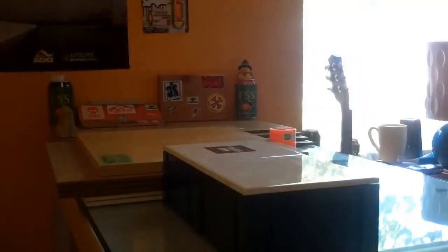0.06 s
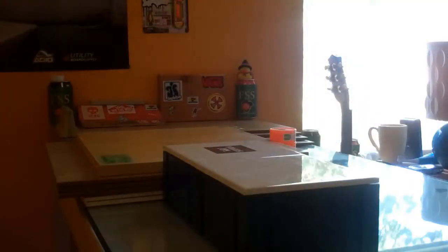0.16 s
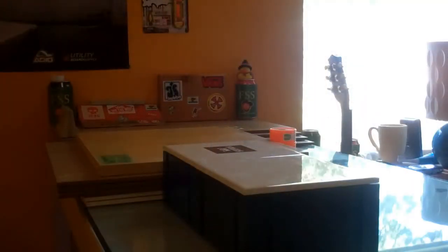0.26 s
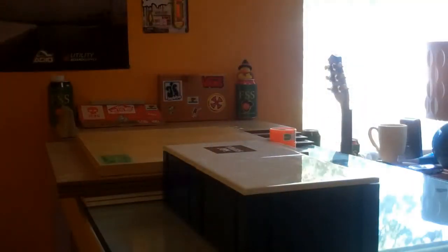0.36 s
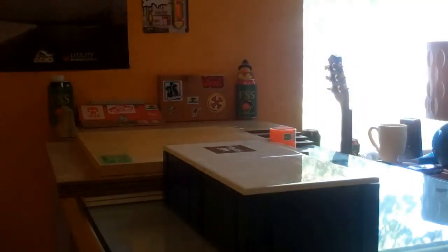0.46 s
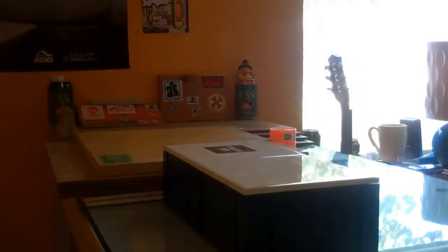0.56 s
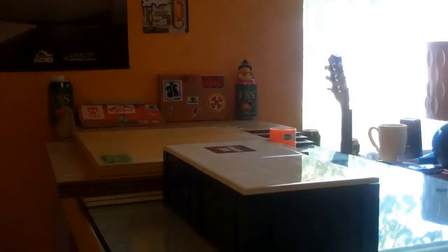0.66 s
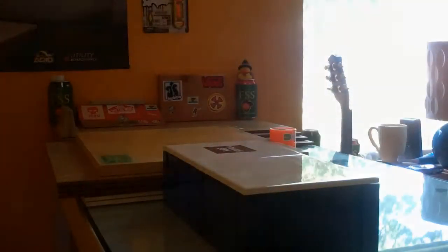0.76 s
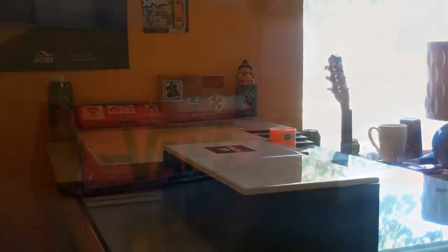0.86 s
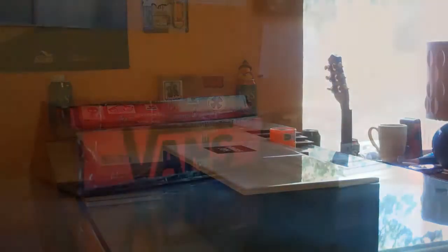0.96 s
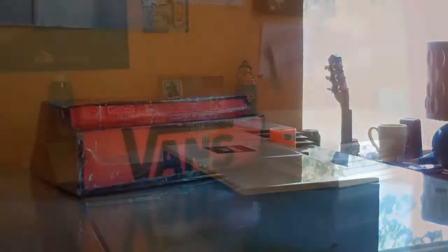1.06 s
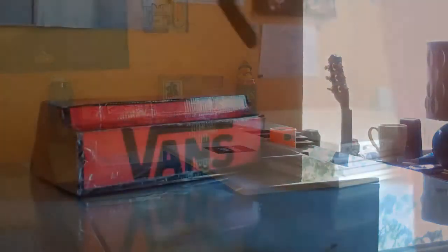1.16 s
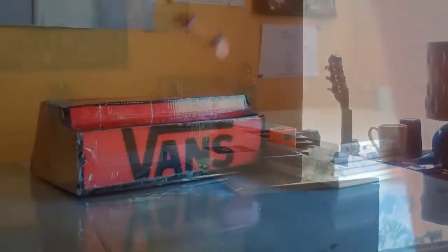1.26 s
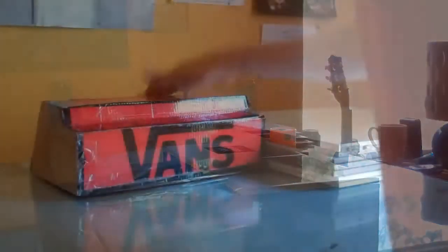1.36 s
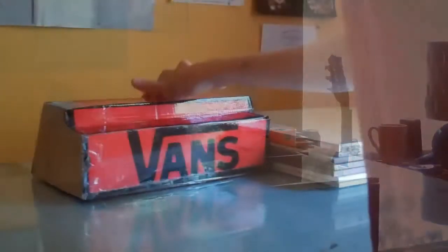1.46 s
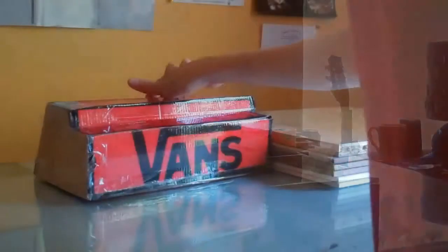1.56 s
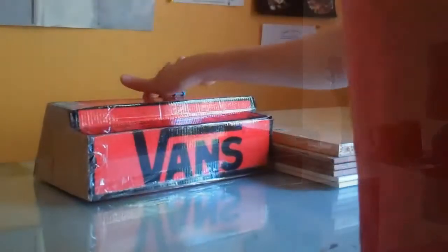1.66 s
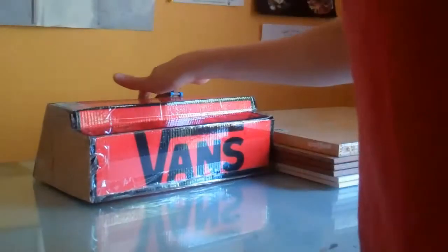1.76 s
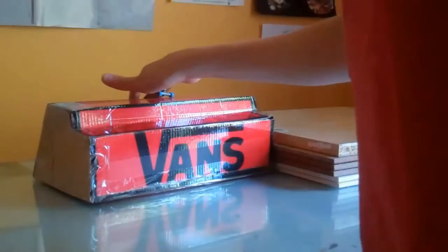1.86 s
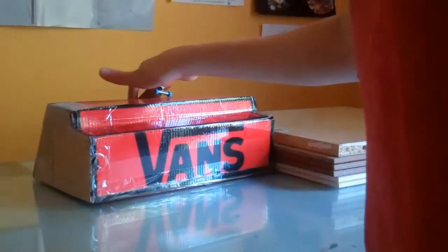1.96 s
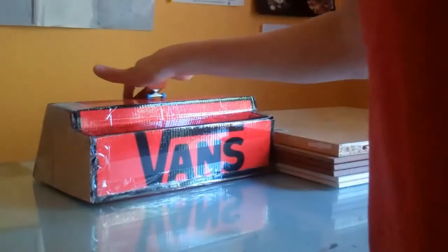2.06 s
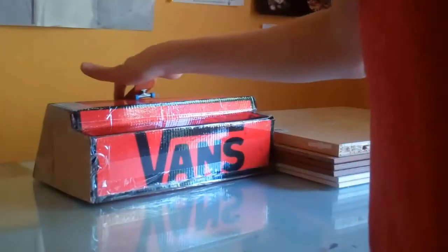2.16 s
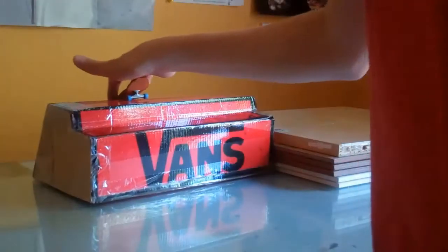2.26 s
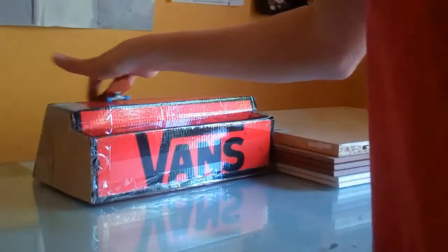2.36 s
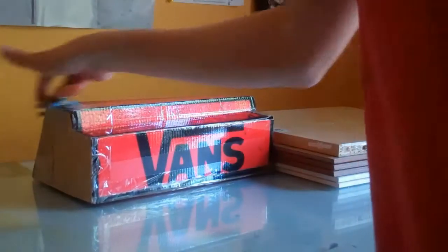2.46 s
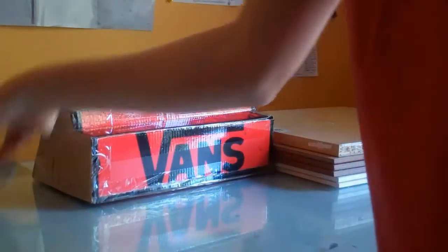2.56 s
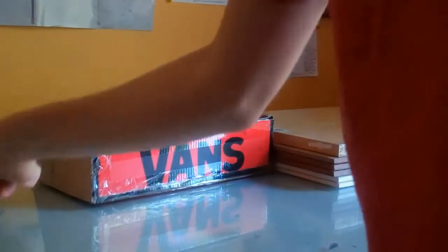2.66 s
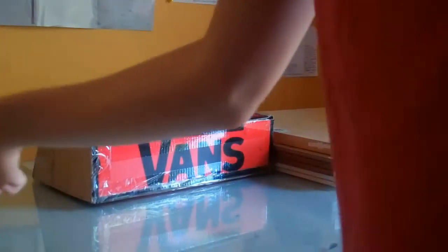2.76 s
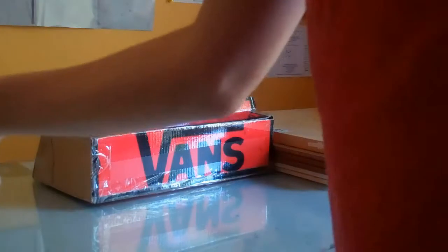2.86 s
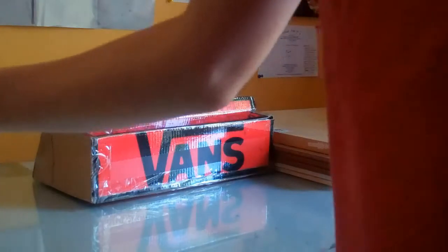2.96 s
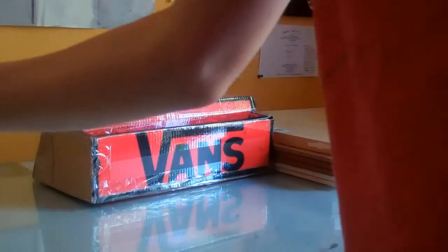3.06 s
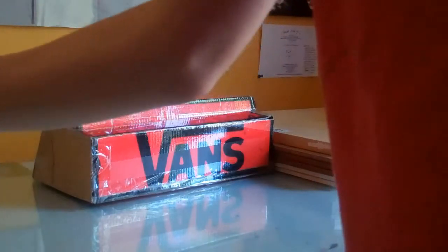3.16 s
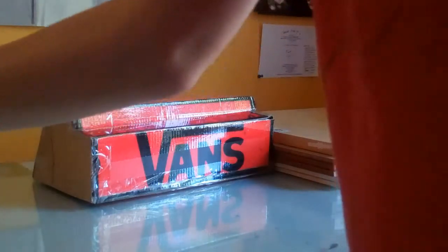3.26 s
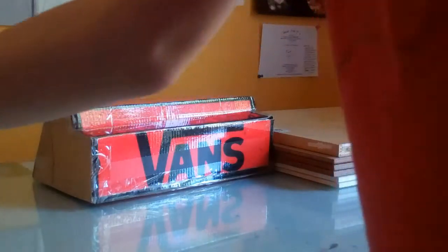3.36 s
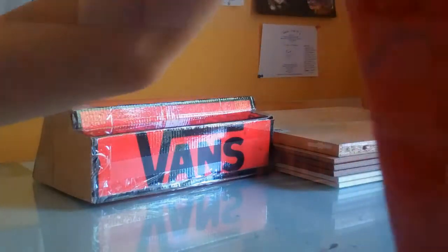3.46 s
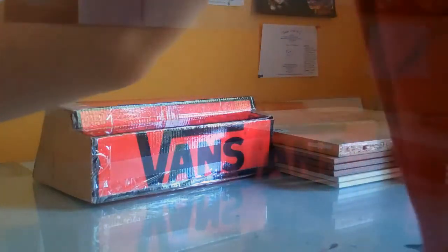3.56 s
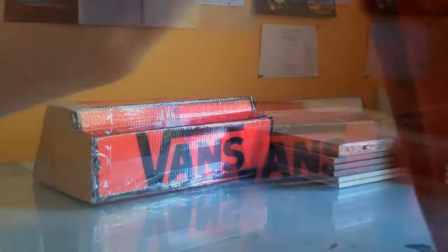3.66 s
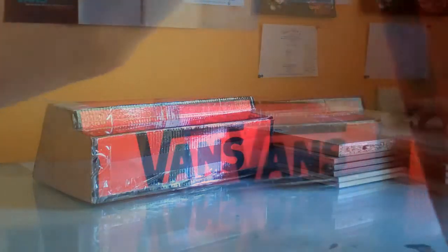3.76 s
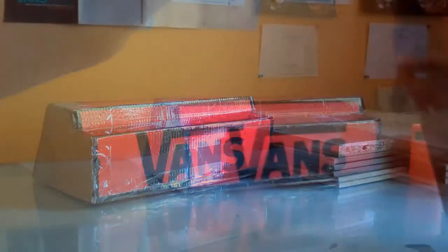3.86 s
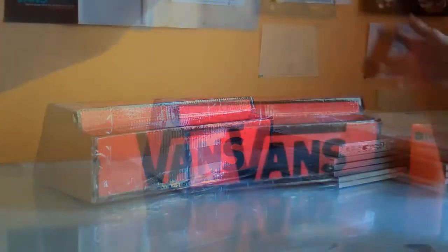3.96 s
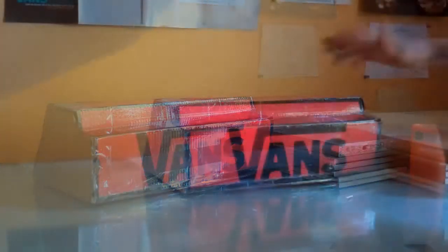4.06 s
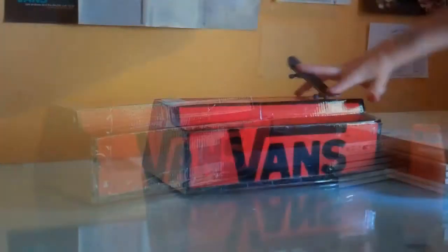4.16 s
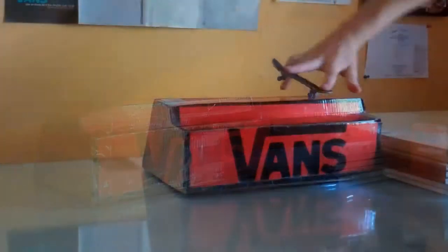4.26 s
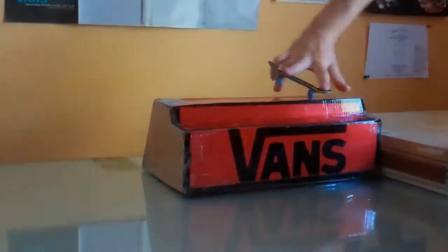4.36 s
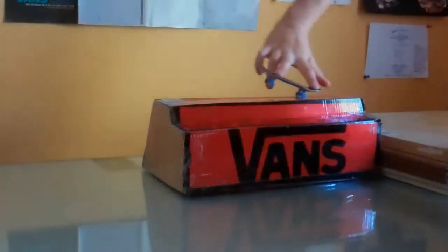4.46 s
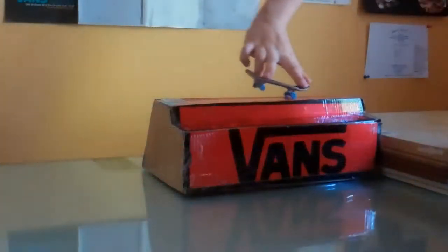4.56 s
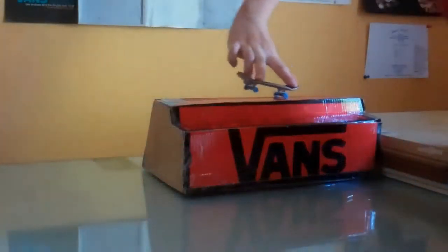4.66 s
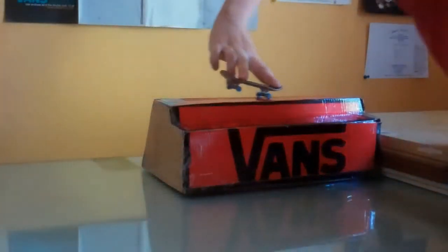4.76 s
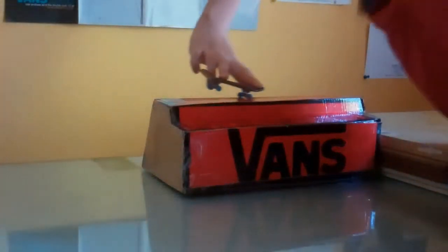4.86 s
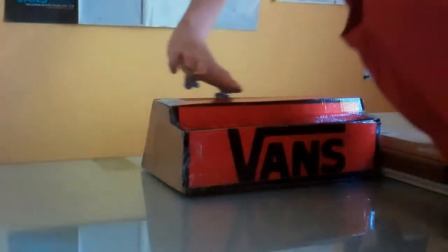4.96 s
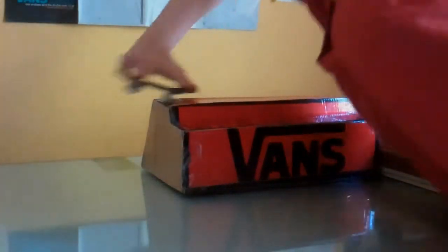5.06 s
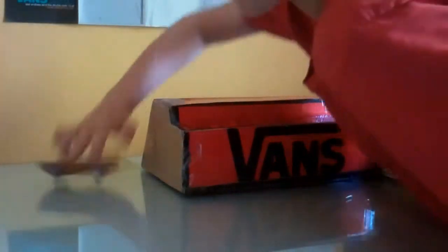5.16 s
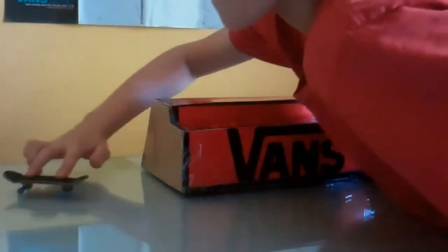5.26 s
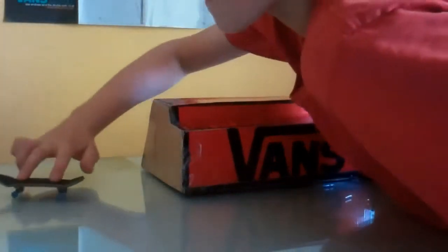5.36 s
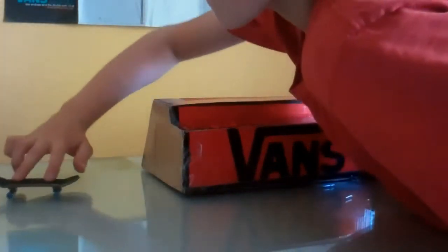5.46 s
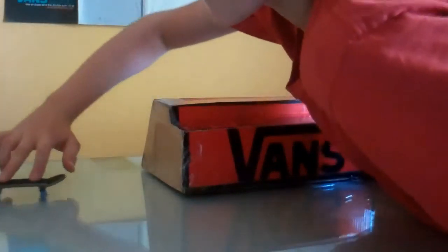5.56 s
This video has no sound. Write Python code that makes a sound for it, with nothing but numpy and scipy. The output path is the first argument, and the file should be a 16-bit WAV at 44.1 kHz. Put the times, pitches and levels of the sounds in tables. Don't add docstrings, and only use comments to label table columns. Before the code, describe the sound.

A tiny finger-driven skateboard rolls and drags on a glossy table, clacks onto a hollow box, grinds its edge and drops off clattering, twice.

```python
import sys
import numpy as np
from scipy import signal
from scipy.fft import rfft, irfft, next_fast_len
from scipy.io import wavfile

SR = 44100
rng = np.random.default_rng(int(sys.argv[2]) if len(sys.argv) > 2 else 0)


def gain_from_decibels(decibels):
    exponent = np.asarray(decibels, float) / 20
    return 10 ** exponent


def master_out(mix):
    frames = np.transpose(np.atleast_2d(mix))
    ceiling = np.clip(frames, -1, 1)
    pcm = np.round(ceiling * 32767).astype(np.int16)
    wavfile.write(sys.argv[1], SR, pcm)


N = 246959
SIZE = next_fast_len(N + SR // 2)
HZ = np.arange(SIZE // 2 + 1) * SR / SIZE
WANDER_DB = 2.0

# (frequency [Hz], width [Hz], level [dB])
HOLLOW = [(243, 103, -7), (397, 46, 1), (476, 65, -0.5), (606, 129, 0), (695, 93, -1)]
# (frequency [Hz], width [Hz], level [dB])
PANELS = [(773, 49, -7), (954, 63, -2), (1076, 92, -0.5), (1254, 170, -2), (1530, 300, -0.5),
          (1730, 440, -2.5), (2026, 390, -4.5), (2610, 160, -6.5), (3150, 490, -10)]


def rms_one(x):
    return x / np.sqrt(np.mean(x ** 2) + 1e-20)


def at_hz(points, hz):
    table_hz, values = np.array(points).T
    return np.interp(np.log(hz + 1), np.log(table_hz), values)


def filtered(x, response):
    return irfft(rfft(x, SIZE) * response, SIZE)[..., :N]


def drift(rate):
    r = np.exp(-80 * np.pi * rate / SR)
    chance = rng.standard_normal(N // 40 + 2002)
    slow = signal.lfilter([1], [1, -2 * r, r * r], chance)[2000:]
    return np.interp(np.arange(N) / 40, np.arange(len(slow)), rms_one(slow))


def swell(at_s, rise_s, fall_s):
    shape = 1.61
    t = np.arange(N) / SR - at_s
    span_s = np.where(t < 0, max(rise_s, .002), max(fall_s, .002))
    return np.exp(-np.abs(t / span_s) ** shape)


def strokes(rows):
    return sum(swell(*row[:3]) * gain_from_decibels(np.cumsum(row[3:]))[:, None] for row in rows)


def grit(per_s, spread_db, lumps_db, lump_rate):
    sizes = gain_from_decibels(spread_db * np.minimum(rng.exponential(1, N), 5)) * rng.choice([-1, 1], N)
    present = rng.random(N) < per_s / SR
    return sizes * present * gain_from_decibels(lumps_db * drift(lump_rate))


def resonate(x, hz, width_hz):
    r = np.exp(-np.pi * width_hz / SR)
    poles = [1, -2 * r * np.cos(2 * np.pi * hz / SR), r * r]
    return signal.lfilter(np.array([1, 0, -1]) * (1 - r * r) / 2, poles, x + 1e-18)


def body(x, peaks, luck_db, turn=-1):
    return sum(turn ** k * gain_from_decibels(db + luck_db[k]) * resonate(x, hz, width_hz)
               for k, (hz, width_hz, db) in enumerate(peaks))


def travelling(x, peaks, wander_db):
    return rms_one(body(x, peaks, [wander_db * drift(8.9) for _ in peaks]))


def rolling():
    # (fastest at [s], rise [s], fall [s], bearing rattle [dB], deck hum above rattle [dB])
    rolls = [(0.0, .02, 0.058, -64.5, -24), (.11, .025, 0.067, -55.5, -0.5), (.23, 0.046, 0.053, -60, -0.5),
             (3.02, 0.079, 0.059, -58.5, 3), (3.4, 0.25, 0.1, -49, 3), (3.49, 0.037, 0.031, -62.5, 8.5),
             (3.62, 0.075, 0.093, -63, 5), (3.82, 0.09, 0.062, -55.5, -3), (4.1, 0.071, 0.11, -62, -4.5),
             (4.22, 0.051, .14, -55.5, 1), (5.09, 0.039, 0.024, -49, 12.5), (5.18, 0.043, 0.038, -51.5, -3),
             (5.235, 0.013, 0.047, -54, -7.5), (5.59, 0.12, .05, -69.5, -10), (2.89, .05, 0.034, -60, -7.5)]
    # (frequency [Hz], width [Hz], level [dB])
    wheels = [(2110, 330, -9), (3140, 480, -6), (3522, 89, 3.5), (3689, 140, 2), (4590, 640, -10),
              (5620, 510, -6), (7560, 940, -9), (10300, 3100, -13.5)]
    # (frequency [Hz], width [Hz], level [dB])
    deck_hum = [(650, 340, -10.5), (972, 120, -3), (1105, 41, 7), (1275, 115, 0), (1435, 157, -3),
                (1716, 190, -3.5)]
    rattle_gain, hum_gain = strokes(rolls)
    bumps = grit(9000.0, 2.6, 1.6, 31.0)
    rattle = rattle_gain * gain_from_decibels(5.0) * travelling(bumps, wheels, WANDER_DB)
    return rattle + hum_gain * gain_from_decibels(-1.3) * travelling(bumps, deck_hum, WANDER_DB)


def air():
    # (deepest at [s], depth [dB])
    ducking = [
        (1.6, 2.5),
        (2.3, 0),
        (2.78, 18),
        (4.0, 3.5),
        (4.359, 2),
        (5.4, 12),
    ]
    # (frequency [Hz], level [dB per Hz])
    colour = [(15, -39.5), (25, -6), (110, -10), (800, -4), (3730, -6.5), (7300, -11.5), (10900, -20),
              (15000, -46.5)]
    # (frequency [Hz], left-right likeness [0 to 1])
    likeness = [(60, 0.02), (180, 0.17), (540, 0.27), (1640, 0.26), (4930, 0.09), (14800, 0.26)]
    sink_s, recover_s, rumble_sinks = 0.11, 0.11, 2.17
    rumble_db, hiss_db, rumble_top_hz = -70.5, -65, 430
    whine_hz, whine_width_hz, whine_db = 7850, 70, -15
    whine_until_s, whine_drops_db = 1.4, 6

    dip_db = sum(depth_db * swell(s, sink_s, recover_s) for s, depth_db in ducking)
    rumble, hiss = gain_from_decibels(rumble_db - rumble_sinks * dip_db), gain_from_decibels(hiss_db - dip_db)
    alike = np.clip(at_hz(likeness, HZ), 0, 1)
    shares = gain_from_decibels(at_hz(colour, HZ)) * np.sqrt([1 + alike, 1 - alike])
    low = 1 / (1 + (HZ / rumble_top_hz) ** 2)
    white = rng.standard_normal((2, N))
    whine = resonate(rng.standard_normal(N), whine_hz, whine_width_hz)
    whine = rms_one(resonate(whine, whine_hz, whine_width_hz))
    lows, highs = filtered(white, shares * low), filtered(white, shares * (1 - low))
    rumbling = rumble * gain_from_decibels(2.0 * drift(0.97)) * lows / lows[0].std()
    mid, side = rumbling + hiss * highs / highs[0].std()
    late = np.arange(N) / SR > whine_until_s
    return np.array([mid + side, mid - side]) + hiss * gain_from_decibels(whine_db - whine_drops_db * late) * whine


def contacts():
    # (time [s], panels [dB], hollow above panels [dB], deck above panels [dB],
    # trucks above deck [dB])
    box_knocks = [(1.384, -29, -6.5, -4, -2.5), (1.409, -47.5, 11, -8, 7), (1.416, -37, -2.5, -2, 2.5),
                  (1.4477, -49, 7, -1, 7), (1.696, -61.5, 7.5, 10.5, -0.5), (2.1009, -24.5, -30, -5, -4.5),
                  (2.1388, -43.5, -31, -1.5, 4), (2.2307, -66, 6, 11, -15),
                  (2.4714, -23, -10.5, -24.5, 11.5), (2.4846, -44, -32, -15, 13),
                  (2.5001, -27.5, -19, -15, 5.5), (4.1547, -30, -0.5, -7.5, 3.5),
                  (4.178, -45.5, -15, 2, 1.5), (4.8499, -34.5, -22, -4.5, -10), (5.1001, -40.5, 6, -8, -8),
                  (5.179, -63, 14, -0.5, 21.5)]
    # (time [s], trucks [dB], deck above trucks [dB], table thump
    # above trucks [dB])
    board_ticks = [(0.0915, -44, -26, -38), (1.057, -46.5, -18, -32), (2.0624, -56, -13, -16),
                   (2.097, -46.5, 7.5, -26), (2.6379, -29, -15.5, -54), (2.6468, -35, -17, -49),
                   (2.658, -43.5, -0.5, -44), (3.5748, -49.5, -13, -22), (3.849, -45.5, -23, -50),
                   (4.1691, -39, -3.5, -16), (5.2158, -32.5, 8, -6), (5.2275, -38.5, -2, -50),
                   (5.2659, -44.5, -17.5, -45)]
    thump_below_hollow_db, panels_below_deck_db, hollow_below_deck_db = 23, 15, 24
    rows = []
    for s, panels, hollow, deck, trucks in box_knocks:
        thump = panels + hollow - thump_below_hollow_db
        rows.append((s, thump, panels + hollow, panels, panels + deck, panels + deck + trucks))
    for s, trucks, deck, weight in board_ticks:
        deck_db = trucks + deck
        rows.append((s, trucks + weight, deck_db - hollow_below_deck_db,
                     deck_db - panels_below_deck_db, deck_db, trucks))
    return rows


def blows():
    # (frequency [Hz], width [Hz], level [dB])
    deck = [(2590, 300, -13), (2960, 890, -1.5), (5030, 2670, -4)]
    # (frequency [Hz], width [Hz], level [dB])
    trucks = [(5100, 3500, 3.5), (6760, 3000, -2.5), (7960, 330, -7), (10600, 3100, -1.5),
              (12800, 910, -9.5)]
    s, thump_db, hollow_db, panel_db, deck_db, truck_db = np.transpose(contacts())[:, :, None]
    t = np.arange(SR // 6) / SR
    noise = rng.standard_normal((len(s), len(t)))
    luck = rng.standard_normal((len(s), 24)).T[:, :, None]

    def through(peaks, luck_db, click, snap_s, rattle_db, rattle_s, soft_hz):
        press = t / snap_s * np.exp(1 - t / snap_s)
        rattle = gain_from_decibels(rattle_db) * np.exp(-t / rattle_s)
        force = (np.arange(len(t)) == 30) * click + noise * (press + rattle)
        force = signal.sosfilt(signal.butter(2, soft_hz, fs=SR, output="sos"), force)
        sound = body(force, peaks, luck_db, turn=1)
        return sound / np.sqrt(np.mean(sound[:, :SR // 160] ** 2, axis=1, keepdims=True))

    push = np.sin(2 * np.pi * 60.0 * t) * np.exp(-t / 0.0048)
    sound = gain_from_decibels(thump_db) * push
    sound = sound + gain_from_decibels(hollow_db - 1.35) * through(HOLLOW, 3.0 * luck, 8.0, .0016, -5.5, .034, 2100.0)
    sound = sound + gain_from_decibels(panel_db - 4.5) * through(PANELS, 0.8 * luck[5:], 11.4, .00033, -14.0, .038, 2060.0)
    sound = sound + gain_from_decibels(deck_db - .3) * through(deck, 1.2 * luck[14:], 2.0, .0006, -21.0, .02, 5500.0)
    sound = sound + gain_from_decibels(truck_db - .3) * through(trucks, 1.5 * luck[18:], 1.5, .0009, -15.0, .018, 14000.0)
    out = np.zeros(N + len(t))
    for start, row in zip(s[:, 0], sound):
        at = round((start - .0006) * SR)
        out[at:at + len(t)] += row
    return out[:N]


def dragging():
    # (fastest at [s], rise [s], fall [s], level [dB])
    drags = [
        (.595, 0.02, 0.036, -55),
        (.75, 0.11, 0.16, -59),
        (.975, 0.035, 0.053, -46),
        (1.41, 0.012, 0.043, -42),
        (1.055, 0.017, 0.013, -59),
        (3.74, 0.051, 0.037, -38.5),
        (3.83, .03, 0.014, -49),
    ]
    # (frequency [Hz], level [dB per Hz])
    friction = [(180, -52), (300, -27), (580, -22.5), (895, -5), (3000, -5.5), (9220, -13), (11400, -19.5),
                (14000, -24)]
    noise = filtered(rng.standard_normal(N), gain_from_decibels(at_hz(friction, HZ)))
    return strokes(drags)[0] * rms_one(noise * gain_from_decibels(0.5 * drift(90.0))) * gain_from_decibels(-2.0)


def grip():
    # (strongest at [s], rise [s], fall [s], level [dB])
    shifts = [
        (.62, 0.018, .12, -62),
        (1.255, 0.054, .025, -56.5),
        (1.37, 0.045, .05, -58),
    ]
    wobble = resonate(resonate(rng.standard_normal(N), 36.0, 22.0), 33.0, 36.0)
    return strokes(shifts)[0] * rms_one(wobble)


def struck_notes():
    # (time [s], frequency [Hz], level [dB], fall by 60 dB [s])
    ringing = [(1.409, 440, -32, .06), (1.696, 410, -47, 0.062), (2.101, 250, -37, 0.11),
               (2.1015, 720, -39, 0.064), (4.155, 430, -31, 0.069), (4.155, 1050, -30.5, 0.054),
               (4.186, 890, -35, 0.073), (5.1, 484, -22, 0.057), (5.2162, 2980, -14, 0.007),
               (5.216, 1940, -20.5, 0.005), (4.8, 970, -22, 0.0059), (5.2156, 300, -27.5, 0.012)]
    out = np.zeros(N)
    for s, hz, db, t60_s in ringing:
        t = np.maximum(np.arange(N) / SR - s, 0)
        onset = 1 - np.exp(-2 * t * hz)
        out += gain_from_decibels(db - 60 * t / t60_s) * onset * np.sin(2 * np.pi * hz * t)
    return out


def grinding():
    # (hardest at [s], rise [s], fall [s], panel drone [dB],
    # hollow boom above drone [dB])
    grinds = [(1.72, 0.05, 0.075, -66, 5), (1.88, 0.058, 0.096, -56, -3.5),
              (2.01, 0.06, 0.036, -68.5, 11.5), (2.17, 0.058, 0.038, -58, -3),
              (2.27, .05, 0.068, -62.5, 0.5), (2.43, 0.084, 0.09, -53, -4), (4.56, 0.09, 0.12, -59.5, -1.5),
              (4.8, 0.11, 0.054, -53.5, -1.5), (4.87, 0.027, 0.039, -46, -12), (5.02, 0.1, 0.11, -45, -2),
              (5.11, 0.011, 0.051, -44, 6.5)]
    # (hardest at [s], rise [s], fall [s], level [dB])
    scrapes = [
        (1.71, .012, 0.011, -63),
        (1.89, 0.088, 0.072, -51),
        (2.17, 0.038, 0.024, -58),
        (2.24, 0.01, 0.012, -62),
        (2.42, 0.054, 0.062, -53.5),
        (2.49, 0.013, 0.044, -50.5),
        (4.55, 0.14, 0.35, -62.5),
        (4.855, 0.016, 0.047, -57.5),
        (5.11, .11, 0.12, -45.5),
    ]
    # (frequency [Hz], width [Hz], level [dB])
    axle_peaks = [(4840, 1600, -5), (5780, 690, 4), (6070, 1080, -1), (7500, 1100, -4),
                  (10100, 3400, -10.5)]
    drone_gain, boom_gain = strokes(grinds)
    scrape_gain = strokes(scrapes)[0]
    bumps = grit(5500.0, 1.7, 1.2, 42.0)
    axle = travelling(grit(12000.0, 1.3, 0.72, 53.0), axle_peaks, 1.2)
    boom = boom_gain * gain_from_decibels(-1.2) * travelling(bumps, HOLLOW, 3.3)
    drone = drone_gain * gain_from_decibels(1.4) * travelling(bumps, PANELS, WANDER_DB)
    return boom + drone + scrape_gain * gain_from_decibels(0.7) * axle


def room(x):
    t60_s, level_db, wall_cut_hz = 0.25, -22, 20000
    dull = 1 / (1 + 1j * HZ / (4 * wall_cut_hz))
    echoes = 0
    for k, lag_s in enumerate(rng.uniform(.006, .03, (8, 2, 1))):
        loop = gain_from_decibels(-60 * lag_s / t60_s) * dull * np.exp(-2j * np.pi * lag_s * HZ)
        echoes = echoes + (-1) ** k * loop / (1 - loop)
    return filtered(x, echoes) * gain_from_decibels(level_db)


def ports(x, lead_s):
    # (frequency [Hz], left-right [dB])
    tilt = [(100, 2.5), (700, 2.5), (4000, 3.5), (6000, 7.5), (8000, 8), (9700, 13.5), (11000, 8),
            (12300, -5)]
    # (frequency [Hz], share of sound scattered [0 to 1])
    scatter = [(1000, 0.038), (3000, 0.47), (6000, 0.82), (9000, 0.72), (12000, 0.96)]
    half = gain_from_decibels(at_hz(tilt, HZ) / 2) * np.exp(1j * np.pi * HZ * lead_s)
    bounce = rng.standard_normal(900) * np.exp(-np.arange(900) / (0.014 * SR))
    share = np.clip(at_hz(scatter, HZ), 0, 1)
    shaded = np.sqrt(1 - share) + np.sqrt(share) * rfft(rms_one(bounce) / 30, SIZE)
    return filtered(x, np.array([half, shaded / half]))


def scene():
    # (frequency [Hz], left-right [dB])
    balance = [(60, 1), (240, 0), (940, -0.5), (3740, 1), (14800, 4.5)]
    table_lead_s, box_lead_s = .000055, .00002
    mic_cut_hz = 9570
    table = rolling() + dragging()
    box = grinding() + blows() + struck_notes()
    board = ports(table + grip(), table_lead_s) + ports(box + room(table + box), box_lead_s)
    board = signal.sosfilt(signal.butter(4, mic_cut_hz, fs=SR, output="sos"), board)
    lean = gain_from_decibels(at_hz(balance, HZ) / 2)
    return board + filtered(air(), np.array([lean, 1 / lean]))


def band_limit(x):
    return signal.sosfilt(signal.butter(12, 15440, fs=SR, output="sos"), x)


def record(dry):
    return band_limit(dry)


dry = scene()
out = record(dry)
master_out(out)
```